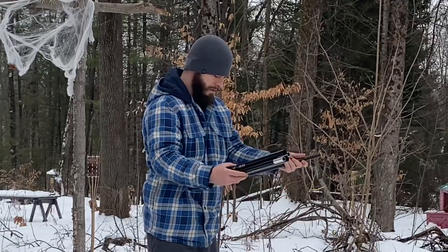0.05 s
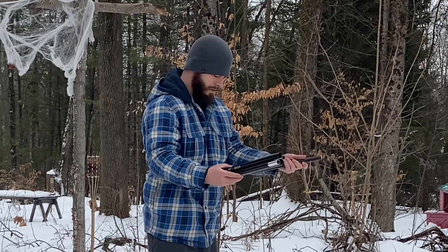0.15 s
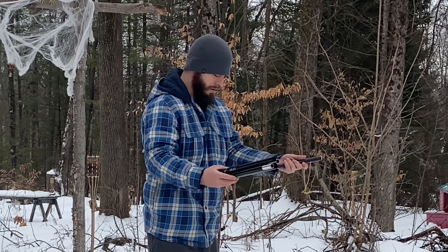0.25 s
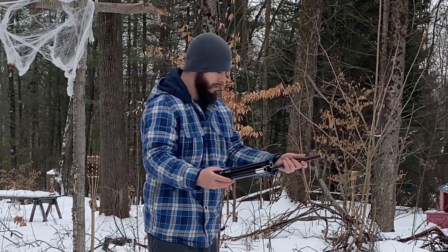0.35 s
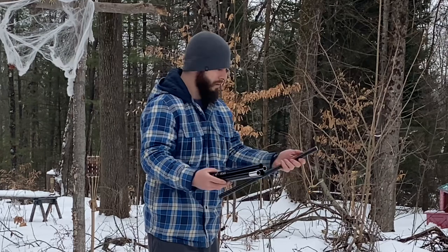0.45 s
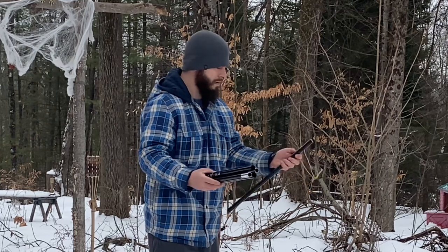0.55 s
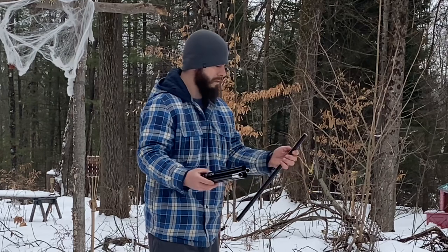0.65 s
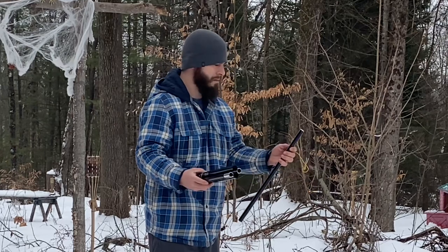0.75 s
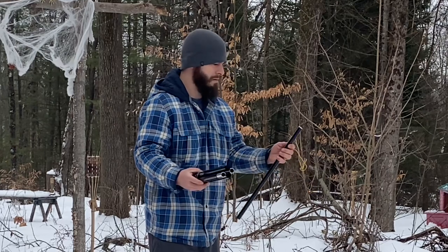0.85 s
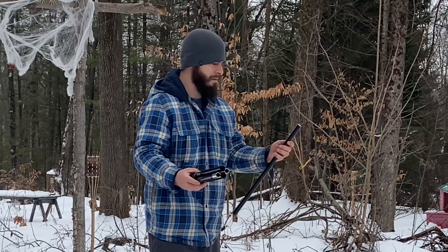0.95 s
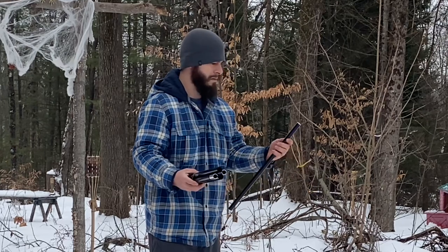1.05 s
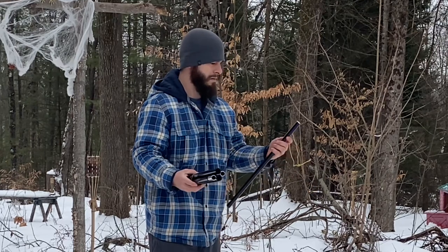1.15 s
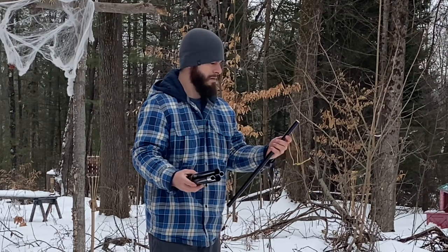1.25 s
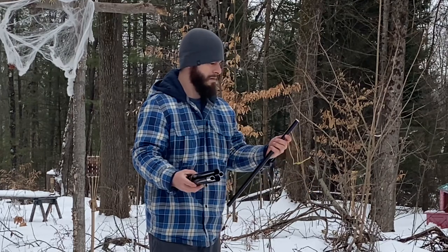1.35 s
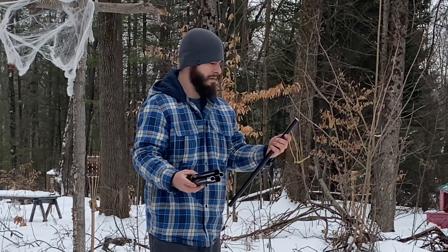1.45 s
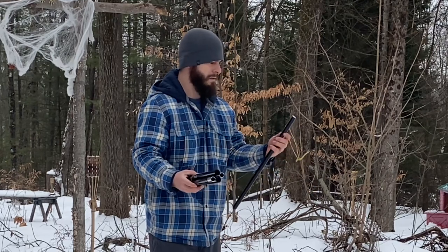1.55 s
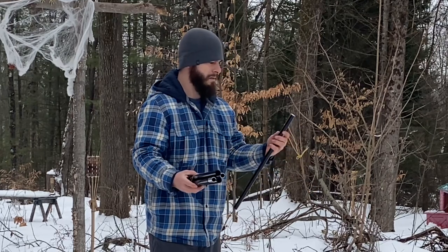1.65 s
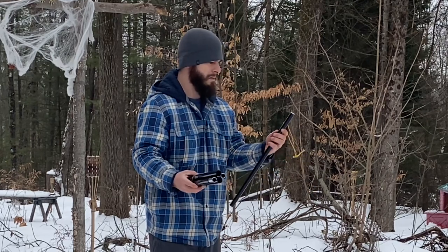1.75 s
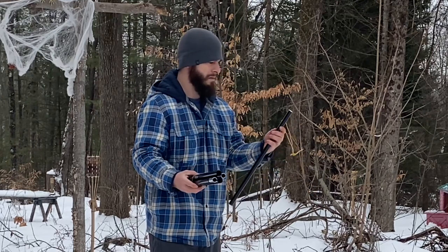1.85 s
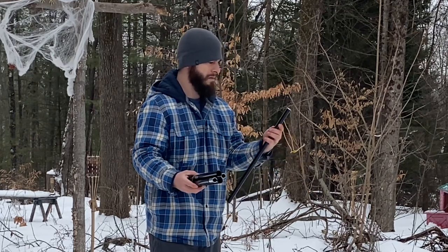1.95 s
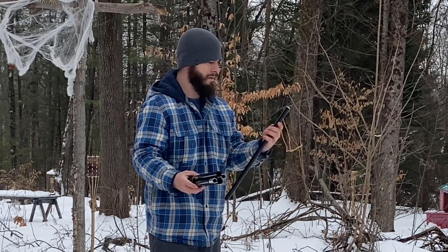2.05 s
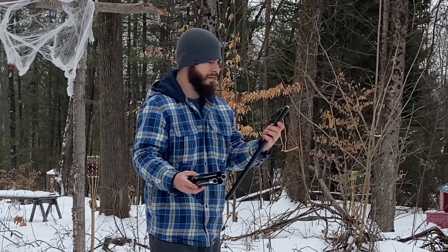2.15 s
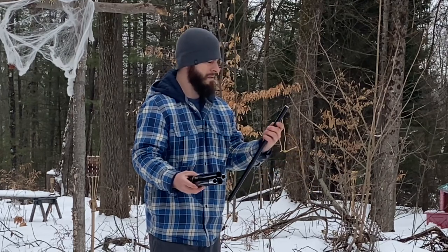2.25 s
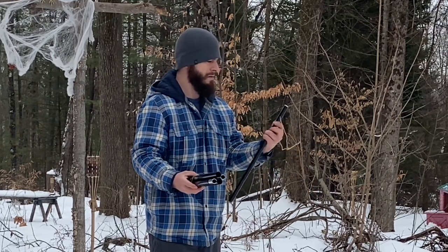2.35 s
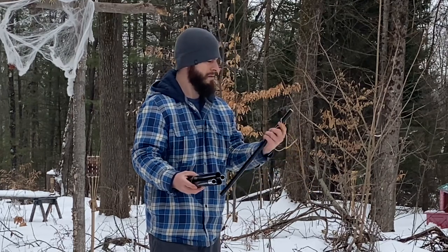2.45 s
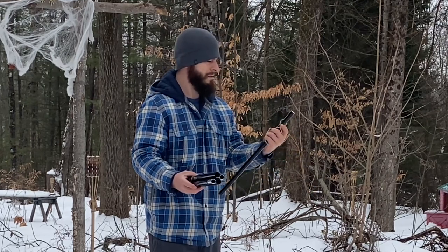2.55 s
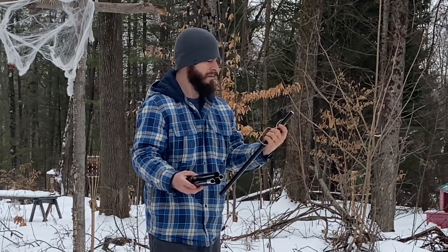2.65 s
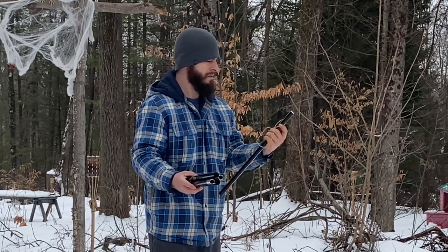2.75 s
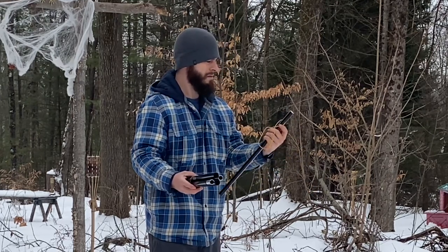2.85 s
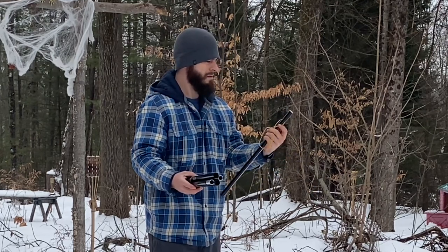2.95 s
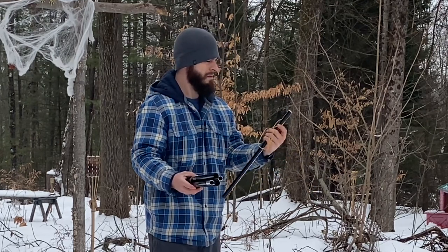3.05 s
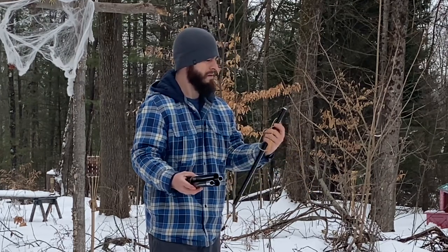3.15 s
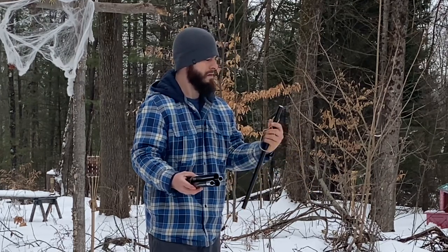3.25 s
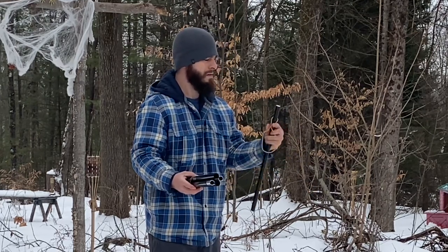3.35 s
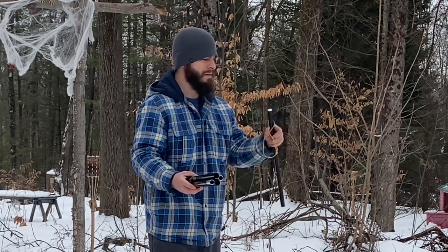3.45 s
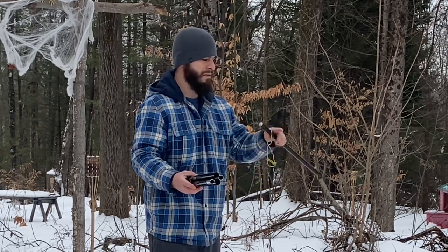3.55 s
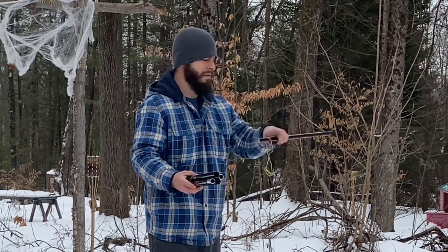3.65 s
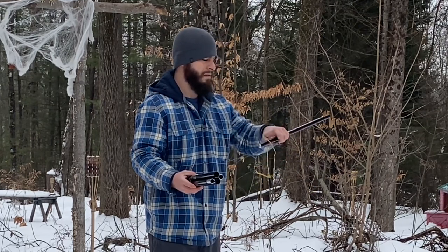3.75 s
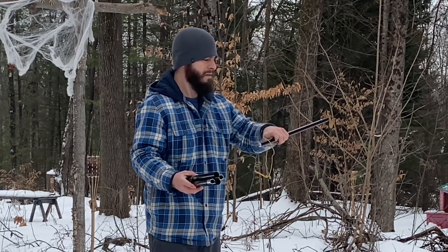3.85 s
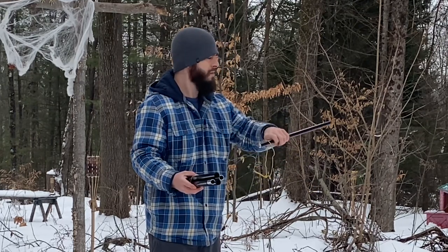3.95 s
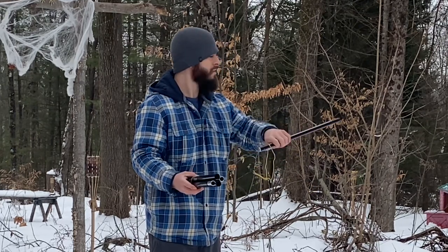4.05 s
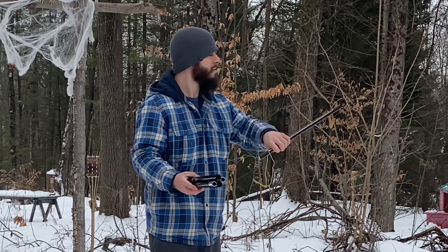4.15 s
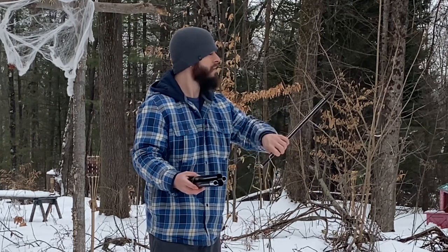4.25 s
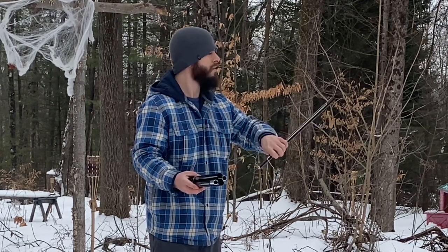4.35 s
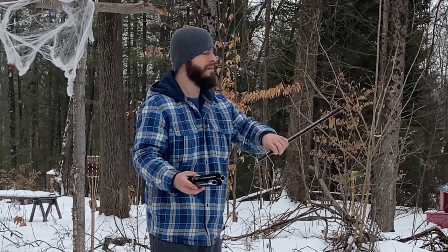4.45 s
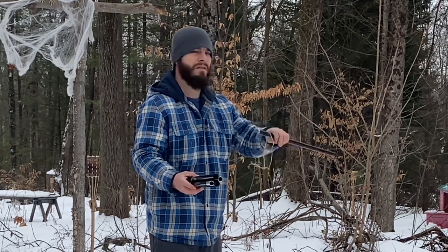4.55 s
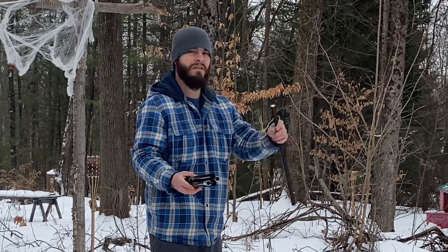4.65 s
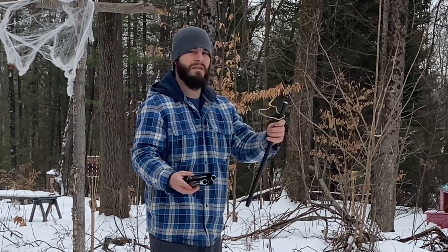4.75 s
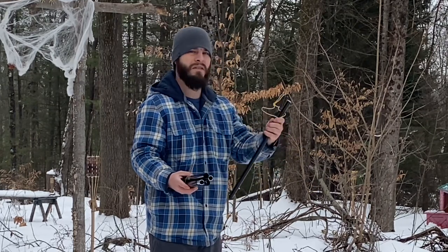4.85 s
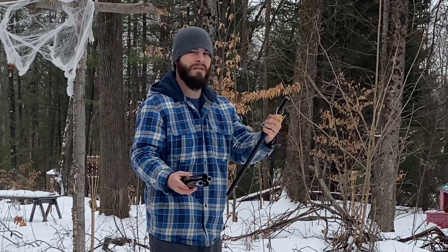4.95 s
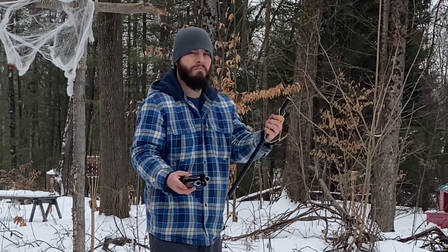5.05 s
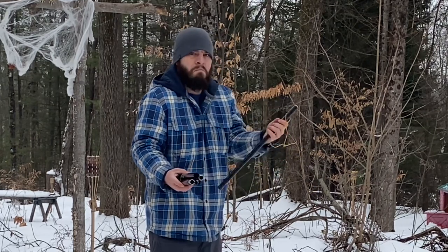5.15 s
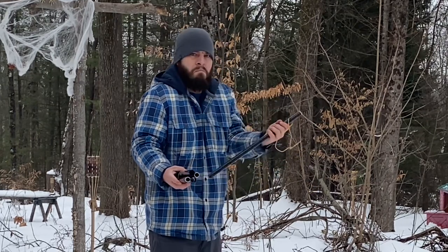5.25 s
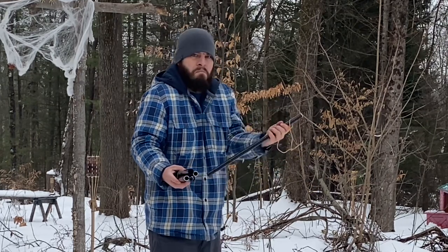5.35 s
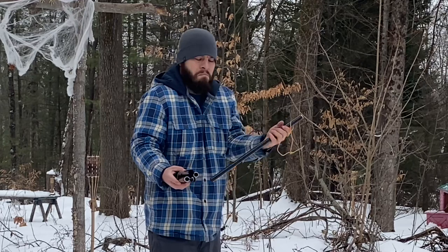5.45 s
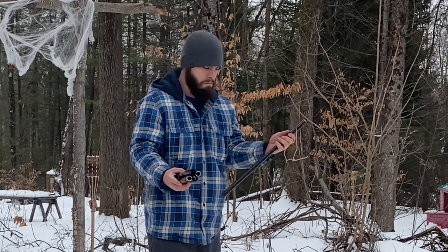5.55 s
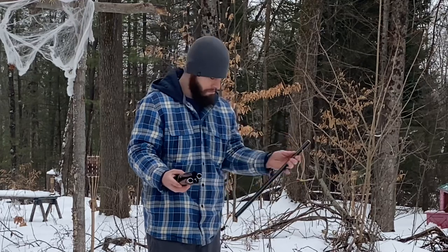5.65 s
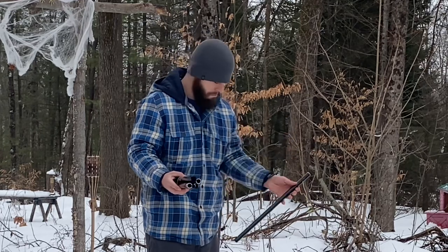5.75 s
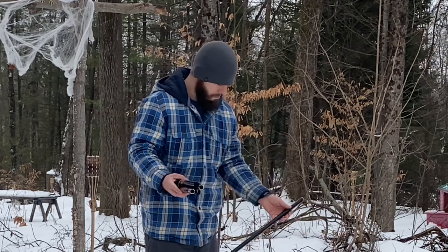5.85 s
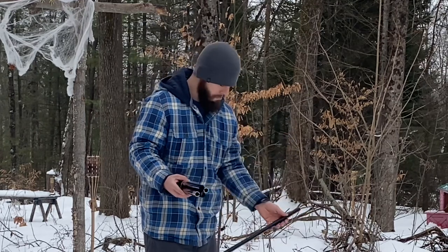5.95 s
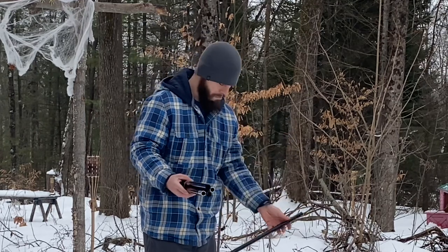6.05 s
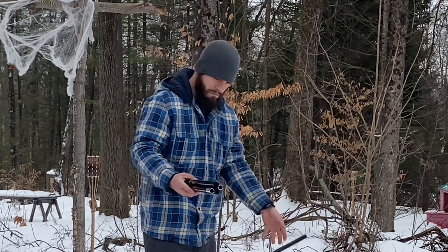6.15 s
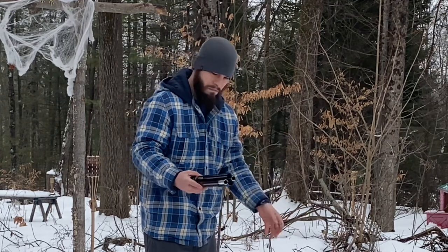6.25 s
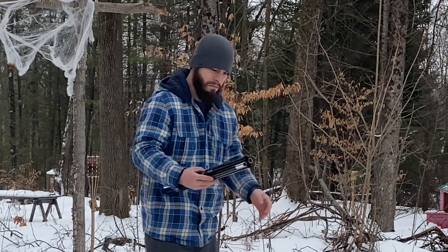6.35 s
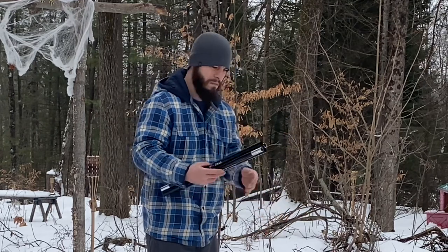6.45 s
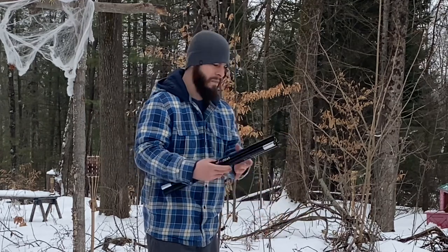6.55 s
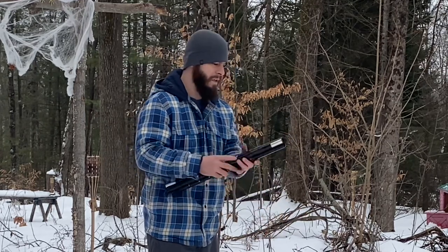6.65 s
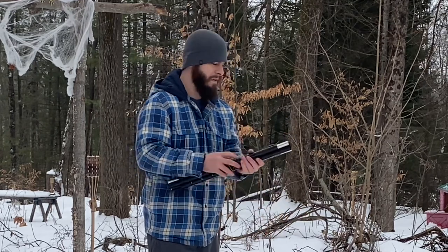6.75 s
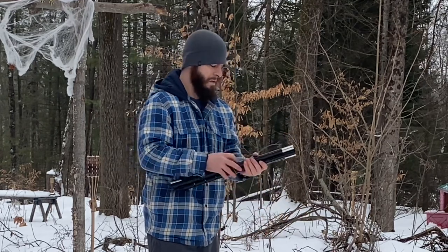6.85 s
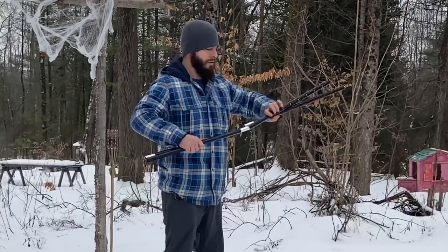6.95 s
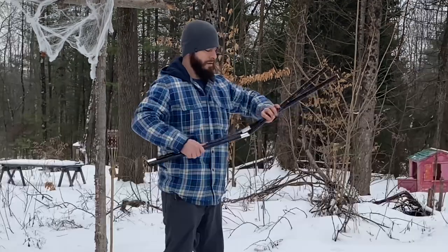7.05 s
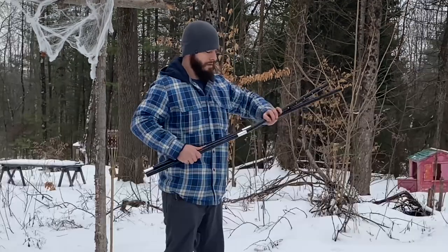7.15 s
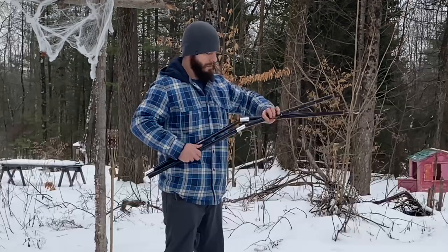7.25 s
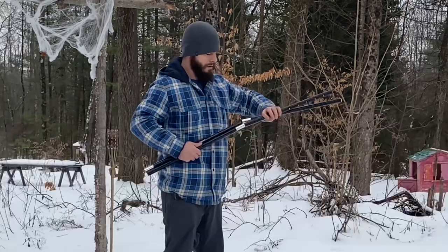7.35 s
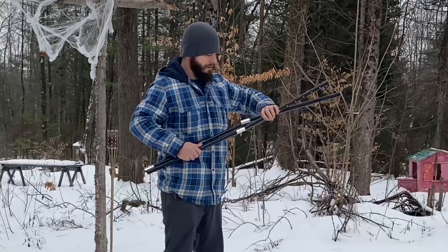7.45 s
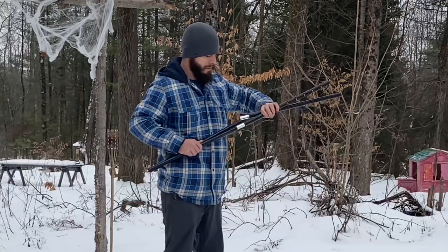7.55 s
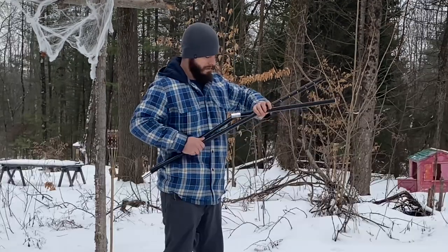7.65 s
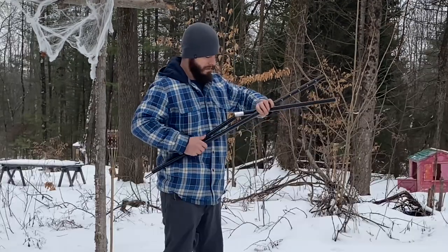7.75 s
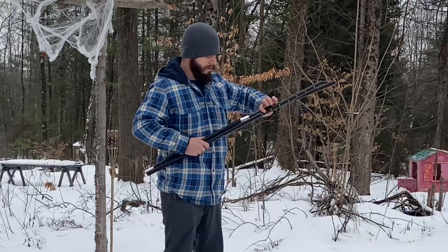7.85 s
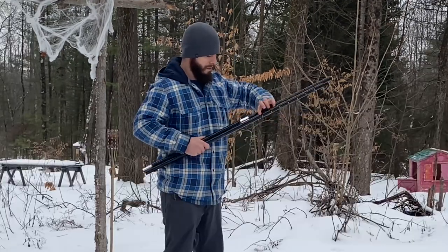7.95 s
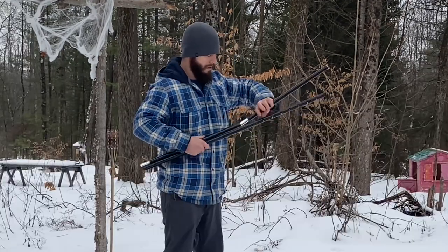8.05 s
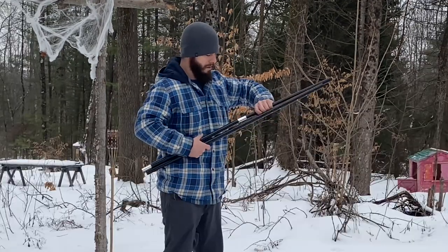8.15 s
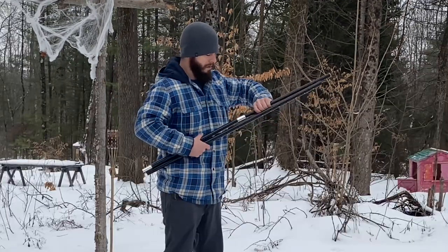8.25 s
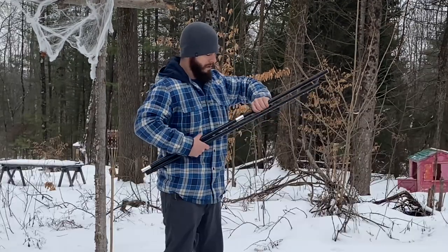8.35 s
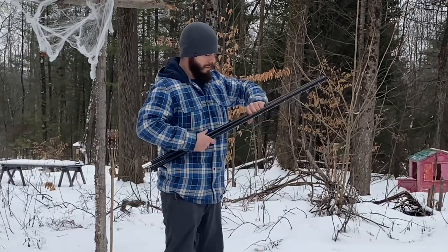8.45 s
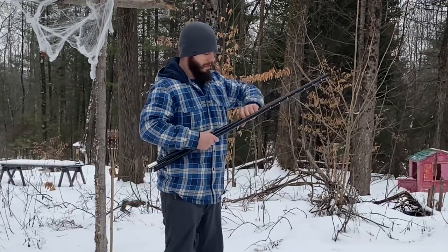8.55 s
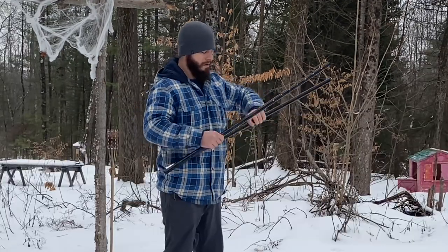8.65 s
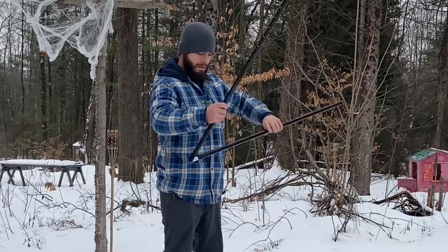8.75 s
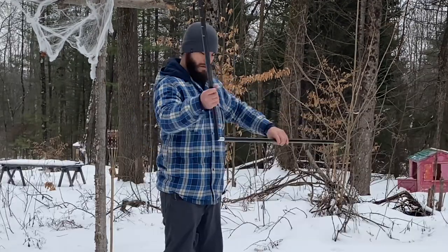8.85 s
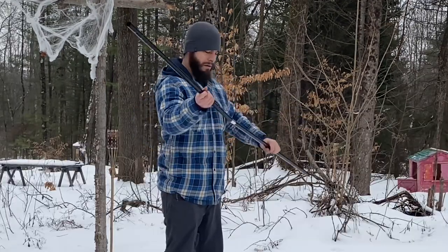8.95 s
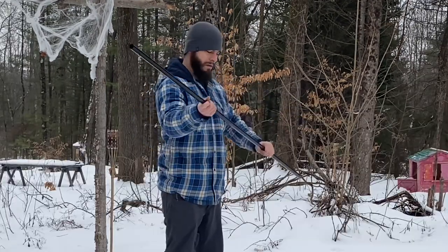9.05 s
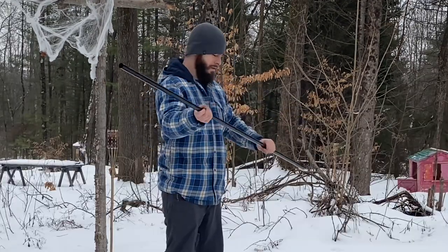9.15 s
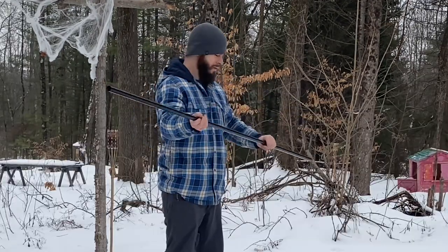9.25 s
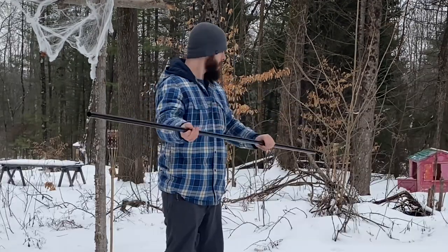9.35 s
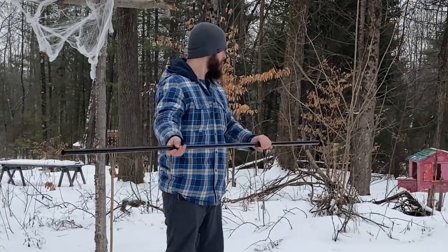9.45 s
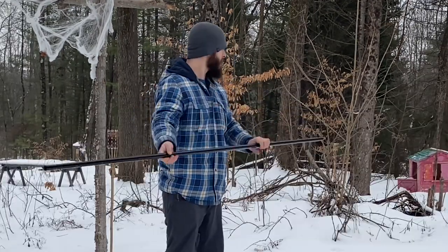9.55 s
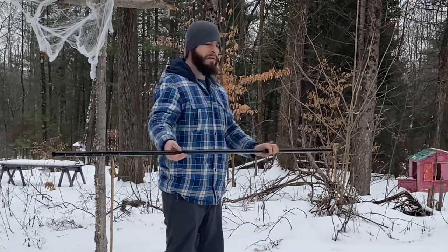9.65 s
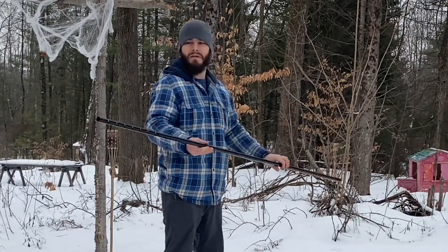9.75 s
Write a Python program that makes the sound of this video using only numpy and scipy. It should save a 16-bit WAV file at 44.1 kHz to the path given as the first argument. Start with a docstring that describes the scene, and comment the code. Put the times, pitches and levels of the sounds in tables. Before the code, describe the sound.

For six seconds it is mostly quiet: soft distant rumble, faint drones, small high bird calls and barely audible tube ticks. A double crunch follows as a piece lands in crusted snow. After a momentary dip in the ambience, a metal pole is unfolded close to the microphone, with chattering knocks, dry sharp snaps, thin squeaks and a final rough slide and clack, lightly echoed by the woods.

```python
"""A sectioned metal tent pole is unfolded by hand, close by in a snowy wood: noise bursts ring tube and joint modes.
Segments tick, scrape (coloured noise) and snap into their ferrules; a dropped piece bursts the snow crust.
Trunks echo the handling (noise tails). Small birds call thinly (gliding sines) over a faint far rumble, drones
and hiss (filtered noise)."""
import sys
import numpy as np
from scipy import signal
from scipy.fft import rfft, irfft, next_fast_len
from scipy.io import wavfile
from scipy.ndimage import uniform_filter1d

SR = 44100
rng = np.random.default_rng(int(sys.argv[2]) if len(sys.argv) > 2 else 0)


def dump_mix(stems):
    """Bounce the given channels to the path in sys.argv[1] as a 16-bit WAV at rate SR."""
    frames = np.atleast_2d(stems).T  # one column per channel
    limited = np.clip(frames, -1, 1)  # hard clip at full scale
    pcm = np.round(limited * 32767).astype(np.int16)
    wavfile.write(sys.argv[1], SR, pcm)


N = 432621
TIME_S = np.arange(N) / SR
BLOW_SAMPLES = 16384
BLOW_TIME_S = np.arange(BLOW_SAMPLES) / SR

# background spectrum: f/Hz, relative density/dB
AIR_SPECTRUM = [(12, -32), (20, -3), (87, -3), (128, -7.5), (147, -13), (189, -9), (286, -10), (511, -14),
                (674, -14.5), (1270, -20), (2280, -29.5), (5690, -35), (6910, -33.5), (8380, -34.5),
                (15000, -37)]
# far rumble: t/s, gain below 400 Hz/dB, gain 400-2200 Hz/dB
RUMBLE_GAINS = [(0, 2, 3.5), (5.5, 2, -1), (7.5, -1.5, 2), (9.8, -1.5, 1.5)]
# faint distant drones: start/s, end/s, f/Hz, level/dB
DRONES = [(0, 1, 186, -80), (1.9, 4.2, 287, -83.5), (6.846, 7.945, 141.5, -74), (7.901, 9.81, 141.6, -79),
          (8.2, 9.602, 497, -81.5), (8.195, 8.998, 744, -86.5)]
# second bird's thin, falling whistles: t/s, length/s, start f/Hz, relative level/dB
WHISTLES = [(0, 0.118, 10580, -84), (.37, 0.51, 9860, -85), (.68, 0.42, 9700, -84.5),
            (1.16, 0.35, 9700, -82.5), (1.46, .16, 10200, -82.5), (2.11, 0.38, 9430, -88.5)]
# rising bird calls: t/s, length/s, note f/Hz, relative level/dB
CHIRPS = [(0.368, 0.066, 7300, -80), (1.028, 0.044, 6960, -67), (1.203, 0.045, 6350, -77),
          (1.663, 0.038, 6190, -76), (2.094, .058, 6690, -70.5), (2.32, .045, 6100, -73.5),
          (2.618, 0.052, 7520, -79), (3.312, .056, 6350, -75.5), (3.713, .054, 6200, -74.5),
          (4.584, 0.045, 6550, -72), (4.663, 0.02, 5845, -70.5), (4.748, 0.047, 6120, -74.5),
          (4.819, 0.021, 5610, -69.5), (4.904, .044, 5870, -69.5), (5.237, 0.035, 6250, -74.5),
          (5.487, .032, 6330, -77), (5.822, .038, 6600, -75), (6.053, .053, 6500, -71.5),
          (6.448, 0.055, 6840, -72), (6.533, 0.054, 6980, -77), (6.727, 0.029, 7370, -76)]
# lower, falling bird note: t/s, length/s, start f/Hz, end f/Hz, relative level/dB
LOW_NOTE = [(1.742, 0.022, 2870, 2170, -75.5)]
# segment resonances, the low ones the air inside: nominal f/Hz, level over the crack/dB, t60/s
TUBE_MODES = [(1414, 2.5, .058), (1780, 4.5, 0.11), (2140, -2, 0.056), (2270, 0.5, .03), (2430, 4, 0.056),
              (2756, 0.5, .033), (3042, -1, 0.05), (3530, -4, .035), (4900, 0, 0.02), (5340, -2, .03),
              (7500, 0, .018), (11440, -1, .016), (15200, 2.5, .04), (14800, 8.5, .012)]
# joint resonances as it seats: f/Hz, level over the crack/dB, t60/s
FERRULE_MODES = [(2750, 5.5, .03), (4040, 9.5, 0.042), (4270, 19, 0.029), (5970, 2.5, 0.042),
                 (6830, 6.5, 0.011), (7130, 3, .02), (12500, 9.5, 0.0064), (12600, 3, .014)]
# segments shifting in the hand: t/s, contact/s, relative strength/dB, brightness/dB
TICKS = [(.4618, .001, -45, -2), (.519, .0008, -43, -1), (2.8, .001, -46.5, -4), (2.8844, .001, -46.5, -1),
         (6.8155, .0046, -49, 3), (7.006, .011, -32.5, -7.5), (7.2532, .0035, -36.5, -2.5),
         (7.363, .0035, -44.5, 2.5), (8.2154, .0033, -37.5, -9.5), (8.5737, .0017, -35, 1),
         (8.593, .0016, -33.5, 7.5), (8.648, .0021, -27.5, -1), (8.9179, .0049, -28.5, -4),
         (8.931, .0047, -28, -8), (8.956, 0.0029, -30, -30)]
# segments snapping home or knocking together: t/s, contact/s, relative strength at 3 kHz/dB,
# then relative to it: low/dB, high/dB, top/dB, tube ring/dB, ferrule ring/dB, echo/dB;
# rebound gap/s, first rebound/dB, loss per further rebound/dB
SNAPS = [(6.8795, 0.0027, -19, -21, 5, 3.5, -8, -13, 8.5, .0042, -7, 1.8),
         (7.606, .0011, -6.5, -9.5, 1, 10, 2.5, -25, 1.5, 0.00181, 1.5, 18),
         (7.738, 0.00045, -17.5, -8.5, 10, 11.5, -1.5, -19, -6.5, 0.0011, -9.5, 25),
         (8.3818, 0.00072, -2, -9.5, 2.5, 4.5, -4, -2.5, -2, 0.0017, 3, 14.5),
         (8.7896, 0.00039, -12.5, -9, -12.5, -31, -6.5, -24.5, -3, .0065, -7, 16),
         (9.0101, 0.0048, -5.5, -8.5, 0, -2, -0.5, -27.5, 3, 0.0076, -8.5, 2)]
# bending and air modes of the pole joined so far, rung by a snap: t/s, f/Hz, t60/s, peak/dB
THRUMS = [(7.607, 840, 0.039, -46), (7.607, 1425, 0.042, -46), (7.607, 2190, 0.024, -32),
          (7.738, 5670, 0.012, -33), (8.383, 144, .22, -58), (8.383, 460, 0.14, -50.5),
          (8.383, 803, 0.13, -52), (8.383, 950, 0.024, -39), (8.7897, 3100, 0.0046, -27),
          (9.011, 516.5, 0.05, -62), (9.011, 1890, 0.019, -34), (9.011, 2430, 0.023, -32.5)]
# segments damped by the hand, tapping: t/s, f/Hz, level/dB
TAPS = [(4.333, 2330, -72), (6.544, 3630, -69), (6.634, 2760, -63.5), (6.684, 3150, -66.5),
        (6.7822, 2367, -51), (7.12, 3200, -66.5), (7.467, 2380, -63), (7.475, 2980, -63)]
# snow crust colour: f/Hz, gain/dB
SNOW_COLOUR = [(30, -3), (110, -1), (170, -11), (240, 6.5), (400, 0), (750, 2), (950, -2), (1500, 3),
               (2500, -1), (4000, -5.5), (9000, -13.5), (11000, -17.5), (16000, -23)]
# dropped piece, one end and then its length: t/s, relative level/dB, slope/(dB/octave)
LANDINGS = [(6.279, -18, 0), (6.3137, -11.5, -2.5)]
# crust gives, breaks, crumbles: delay/s, relative level/dB, decay/s, added slope/(dB/octave)
CRUST_STAGES = [(-.004, -8, 0.02, 0.5), (0, -0.5, 0.0027, 1), (.0045, -5, 0.0073, 1), (.009, -12, .03, 3.5)]
# turning joint: t/s, length/s, start f/Hz, end f/Hz, relative level/dB
SQUEAKS = [(7.05, .03, 12900, 14100, -80), (7.478, .03, 13300, 14700, -77.5),
           (7.875, 0.027, 13280, 14500, -83.5), (8.088, .02, 14770, 15300, -65.5),
           (8.685, 0.029, 13700, 14500, -70), (8.715, 0.046, 14300, 14690, -78.5)]
# tube sliding in a joint: start/s, stop/s, level at the stop/dB, squeal over the grit/dB
SLIDES = [(7.717, 7.736, -55.5, -20), (8.573, 8.611, -60, -3), (8.623, 8.646, -60, 4),
          (8.773, 8.79, -63, -20), (8.912, 9.008, -73.5, 3)]
# sliding grit colour: f/Hz, gain/dB
SCRAPE_COLOUR = [(300, -25.5), (1500, -11), (4500, 5), (7500, 6.5), (10000, -3), (13000, -14.5),
                 (15500, -5)]
# echo colour of the wood: f/Hz, gain/dB
WOOD_COLOUR = [(200, -17.5), (1000, -10), (2400, 2), (5000, 1.5), (7000, -3.5), (9000, -7.5), (13000, -9),
               (16000, -14)]

AIR_DB, HISS_TOP_HZ = -70.5, 15100
DIP_AT_S, DIP_WIDTH_S, DIP_DB = 6.869, .006, -58  # the background dips briefly
WHISTLE_END_HZ = 9430
# each call starts a little below its note and climbs this share of the way from it to one pitch
CHIRP_AIM_HZ, CHIRP_REACH, CHIRP_SCOOP_HZ = 7940, .8, 350
BIRD_DB, BIRD_ECHO_DB = -6, -9
# relative to the tick's strength
TICK_LOW_DB, TICK_TOP_DB, TICK_TUBE_DB, TICK_FERRULE_DB, TICK_ECHO_DB = -7.5, -9, 1, -19, -1
REBOUND_CONTACT, REBOUND_MAX_S = .99, .0064  # chatter lasts this share of the gap, up to a limit
TAP_T60_S, TAP_ATTACK_S = .023, .00048
SQUEAK_DB = -4.5
SLIDE_SWELL_DB, SLIDE_ATTACK_S, SLIDE_RELEASE_S = 5.5, .0051, .01
NEAR_TRUNK_S, NEAR_TRUNK_SPREAD_S, NEAR_TRUNK_DB = .044, .004, -11.5
HANDLING_SEND_DB, ECHO_DB = -8.5, -18.5
TOP_HZ = 15900


def undb(db):
    """Decibels to gain."""
    return 10 ** (np.asarray(db) / 20)


def unit(x):
    """Scale to rms 1."""
    return x / np.sqrt(np.mean(x ** 2))


def curve(rows, axis=1):
    """One column of a time table at every sample."""
    rows = np.array(rows)
    return np.interp(TIME_S, rows[:, 0], rows[:, axis])


def colour(x, points):
    """Causal minimum-phase filter, via the cepstrum, whose gain follows (f/Hz, gain/dB) points."""
    hz, db = np.transpose(points)
    size = 2 * next_fast_len(len(x) // 2 + 1)
    f_hz = np.maximum(np.fft.rfftfreq(size, 1 / SR), 1)
    gain = undb(np.interp(np.log(f_hz), np.log(hz), db))
    cepstrum = irfft(np.log(gain))
    cepstrum[1:size // 2] *= 2
    cepstrum[size // 2 + 1:] = 0
    response = np.exp(rfft(cepstrum))
    return irfft(rfft(x, size) * response)[:len(x)]


def resonate(x, hz, t60_s):
    """One resonance, gain 1 at its centre."""
    hz = min(hz, .45 * SR)
    q = hz * t60_s * np.pi / np.log(1000)
    return signal.lfilter(*signal.iirpeak(hz, q, fs=SR), x)


def walk(rate_hz, size):
    """Random wander of spread near 1, linear between random points."""
    steps = np.arange(size) / SR * rate_hz
    return np.interp(steps, np.arange(size), rng.standard_normal(size))


def add(out, s, x):
    """Mix x into out from time s."""
    start = max(int(s * SR), 0)
    out[start:start + len(x)] += x[:len(out) - start]


def contact(envelope, grain_db):
    """Burst of tiny impacts under an envelope, unit energy spread evenly over the broad bands."""
    size = len(envelope)
    impacts = rng.standard_normal(size) * envelope
    burst = rfft(impacts * undb(grain_db * walk(3000, size)))
    broad = uniform_filter1d(np.abs(burst) ** 2, size=size // 24)
    fade = np.minimum(np.arange(size)[::-1] / (size / 2), 1)
    return irfft(burst / np.sqrt(broad)) * fade


def glides(calls, waver, bend, swell=.84):
    """Near-pure glides that swell and fade, pitch slightly unsteady; a larger swell peaks later."""
    out = np.zeros(N)
    for s, length_s, start_hz, end_hz, db in calls:
        u = np.linspace(0, 1, int(length_s * SR))
        path_hz = start_hz + (end_hz - start_hz) * u ** bend
        hz = path_hz * (1 + waver * walk(350, SR)[:len(u)])
        envelope = 2 * np.sin(np.pi * u ** swell)
        add(out, s, undb(db) * envelope * np.sin(2 * np.pi * np.cumsum(hz) / SR))
    return out


def drones():
    """Noise through a doubled narrow resonance, faded in and out."""
    out = np.zeros(N)
    for start_s, end_s, hz, db in DRONES:
        swell = np.clip(np.minimum(TIME_S - start_s, end_s - TIME_S) / .082, 0, 1)
        hum = resonate(resonate(rng.standard_normal(N), hz, .095), hz, .095)
        out += undb(db) * swell * unit(hum)
    return out


def background(flicker_db=1):
    """Far rumble that slowly ebbs, faint drones and a smooth hiss above."""
    air = unit(colour(rng.standard_normal(N), AIR_SPECTRUM)) * undb(AIR_DB)
    low = signal.sosfiltfilt(signal.butter(2, 400, fs=SR, output="sos"), air)
    below_hiss = signal.sosfiltfilt(signal.butter(2, 2200, fs=SR, output="sos"), air)
    hiss, middle = air - below_hiss, below_hiss - low
    low_gain = undb(curve(RUMBLE_GAINS) + flicker_db * walk(7, N))
    middle_gain = undb(curve(RUMBLE_GAINS, axis=2) + flicker_db * walk(6.6, N))
    out = hiss + low * low_gain + middle * middle_gain + drones()
    dip = undb(DIP_DB * np.exp(-np.abs(TIME_S - DIP_AT_S) / DIP_WIDTH_S))
    return signal.sosfilt(signal.butter(14, HISS_TOP_HZ, fs=SR, output="sos"), out) * dip


def whistles():
    """Sine glides that each sink to the same pitch."""
    calls = [(s, length_s, hz, WHISTLE_END_HZ, db) for s, length_s, hz, db in WHISTLES]
    return glides(calls, waver=.01, bend=.7)


def chirps(flick_s=.006, flick_hz=2000, flick_db=-7):
    """Each call scoops up from below, then flicks sharply down."""
    climbs, flicks = [], []
    for s, length_s, hz, db in CHIRPS:
        end_hz = hz + CHIRP_REACH * (CHIRP_AIM_HZ - hz)
        climbs.append((s, length_s, hz - CHIRP_SCOOP_HZ, end_hz, db))
        flicks.append((s + .92 * length_s, flick_s, end_hz, end_hz - flick_hz, db + flick_db))
    return glides(climbs, waver=.004, bend=.62, swell=1.22) + glides(flicks, waver=.0053, bend=.89)


def tick_blows():
    """Ticks: single light blows differing only in length, strength and brightness."""
    blows = []
    for s, contact_s, db, bright_db in TICKS:
        top_db = TICK_TOP_DB + 1.4 * bright_db
        blows.append((s, contact_s, db, TICK_LOW_DB, bright_db, top_db,
                      TICK_TUBE_DB, TICK_FERRULE_DB, TICK_ECHO_DB))
    return blows


def snap_blows():
    """Each snap: a strike and three evenly spaced, ever weaker rebounds."""
    blows = []
    for s, contact_s, db, *timbre, gap_s, rebound_db, loss_db in SNAPS:
        blows.append((s, contact_s, db, *timbre))
        rebound_s = min(REBOUND_CONTACT * gap_s, REBOUND_MAX_S)
        for k in range(3):
            blows.append((s + (k + 1) * gap_s, rebound_s, db + rebound_db - k * loss_db, *timbre))
    return blows


def blow_tone(low_db, high_db, top_db):
    """Blow colour, flat at 2-4 kHz: (f/Hz, gain/dB) points."""
    return [(80, low_db - 16.5), (300, low_db - 12.5), (600, low_db - 3.5), (1000, low_db),
            (2000, .00046), (4000, .0058), (7500, high_db),
            (11000, (high_db + top_db) / 2), (14500, top_db)]


def ring(crack, modes, shifts):
    """Parallel resonances driven by a crack, each shifted in pitch."""
    return sum(undb(db) * resonate(crack, hz * shift, t60_s)
               for (hz, db, t60_s), shift in zip(modes, shifts))


def pole(chatter_db=-19, chatter_s=.0058, grain_db=3, detune=.0019):
    """Brief metal chatter rings tube and ferrule; returns the direct sound and the send to the wood."""
    direct, outward = np.zeros(N), np.zeros(N)
    for s, contact_s, db, *tone_db, tube_db, ferrule_db, echo_db in snap_blows() + tick_blows():
        strike = np.exp(-(BLOW_TIME_S / contact_s) ** 4)
        chatter = undb(chatter_db) * np.exp(-BLOW_TIME_S / chatter_s)
        crack = contact(strike + chatter, grain_db)
        grip = 1 + detune * rng.standard_normal(len(TUBE_MODES))  # the hand shifts the modes per blow
        tube = undb(tube_db) * ring(crack, TUBE_MODES, grip)
        joint = undb(ferrule_db) * ring(crack, FERRULE_MODES, np.ones(len(FERRULE_MODES)))
        tone = blow_tone(*tone_db)
        add(direct, s, undb(db - 3) * colour(crack + tube + joint, tone))
        sent = crack + undb(-14.5) * tube + undb(-8) * joint
        add(outward, s, undb(db + echo_db - 2) * colour(sent, tone))
    return direct, outward


def low_note():
    """One short sine falling at an even rate."""
    return glides(LOW_NOTE, waver=.01, bend=1)


def taps(overtone=1.7, overtone_db=-9):
    """A soft contact rings two short bending modes."""
    out = np.zeros(N)
    for s, hz, db in TAPS:
        phase = 2 * np.pi * hz * BLOW_TIME_S
        modes = np.sin(phase) + undb(overtone_db) * np.sin(overtone * phase)
        decay = undb(db - 60 * BLOW_TIME_S / TAP_T60_S)
        add(out, s, modes * decay * np.minimum(BLOW_TIME_S / TAP_ATTACK_S, 1))
    return out


def snow(grain_db=5):
    """One end of the dropped piece cracks the crust, then its length thuds in: coloured bursts."""
    out = np.zeros(N)
    for s, db, slope_db in LANDINGS:
        for delay_s, stage_db, decay_s, stage_slope_db in CRUST_STAGES:
            slope = slope_db + stage_slope_db
            tone = [(hz, g + slope * np.log2(max(hz, 400) / 3000)) for hz, g in SNOW_COLOUR]
            burst = contact(np.exp(-BLOW_TIME_S / decay_s), grain_db)
            add(out, s + delay_s, undb(db + stage_db) * colour(burst, tone))
    return out


def squeaks():
    """A turning joint squeaks: thin rising sine glides."""
    return undb(SQUEAK_DB) * glides(SQUEAKS, waver=.01, bend=.6)


def thrums():
    """Decaying cosines: the joined length bends and its air resonates after a snap."""
    out = np.zeros(N)
    for s, hz, t60_s, db in THRUMS:
        add(out, s, undb(db - 60 * BLOW_TIME_S / t60_s) * np.cos(2 * np.pi * hz * BLOW_TIME_S))
    return out


def sliding(squeal_hz=15050):
    """Uneven tube-on-ferrule friction with a thin stick-slip squeal; each stroke swells until it stops."""
    friction = rng.standard_normal(N)
    roughness = undb(3.5 * walk(210, N) + 4 * walk(1400, N))
    grit = unit(colour(friction * roughness, SCRAPE_COLOUR))
    squeal = unit(resonate(rng.standard_normal(N), squeal_hz, .015))
    out = np.zeros(N)
    for start_s, stop_s, db, squeal_db in SLIDES:
        attack = np.clip((TIME_S - start_s) / SLIDE_ATTACK_S, 0, 1)
        release = np.exp(-np.clip(TIME_S - stop_s, 0, 1) / SLIDE_RELEASE_S)
        swell = undb(db + np.interp(TIME_S, [start_s, stop_s], [-SLIDE_SWELL_DB, 0]))
        out += attack * release * swell * (grit + undb(squeal_db) * squeal)
    return out


def trunks(x, early_t60_s=.36, late_t60_s=1.2, late_db=-15, gap_s=.023, patchy_db=3):
    """Scattered trunk echoes as a noise tail: the near ones arrive together, the deep wood lingers."""
    t = np.arange(SR) / SR
    decay = undb(-60 * t / early_t60_s) + undb(late_db - 60 * t / late_t60_s)
    envelope = decay * np.minimum(t / gap_s, 1) ** 2
    echoes = rng.standard_normal(SR) * envelope * undb(patchy_db * walk(200, SR))
    return signal.fftconvolve(x, unit(echoes) / np.sqrt(SR))[:N]


def near_trunk(x):
    """A single distinct echo, smeared by rough bark."""
    bark = np.zeros(BLOW_SAMPLES)
    add(bark, NEAR_TRUNK_S, contact(np.exp(-BLOW_TIME_S / NEAR_TRUNK_SPREAD_S), grain_db=2))
    return undb(NEAR_TRUNK_DB) * signal.fftconvolve(x, bark)[:N]


def scene():
    """The pole close by, the birds deep among the trunks."""
    blows, outward = pole()
    handling = sliding() + taps() + snow() + squeaks()
    birds = chirps() + whistles() + low_note()
    sent = outward + undb(HANDLING_SEND_DB) * handling
    echo = undb(ECHO_DB) * colour(trunks(sent) + near_trunk(sent), WOOD_COLOUR)
    bird_echo = trunks(birds, early_t60_s=.35, late_t60_s=.83, gap_s=.0068)
    far_birds = undb(BIRD_DB) * birds + undb(BIRD_ECHO_DB) * bird_echo
    return (blows + thrums() + handling + echo + far_birds + background())[None]


def record(dry):
    """The recorder cuts the top: steep elliptic low-pass."""
    return signal.sosfilt(signal.ellip(8, .2, 70, TOP_HZ, fs=SR, output="sos"), dry)


dry = scene()
out = record(dry)
dump_mix(out)
```